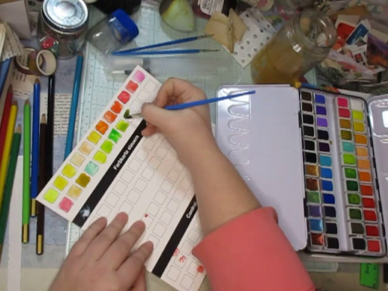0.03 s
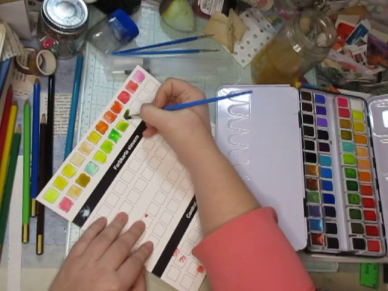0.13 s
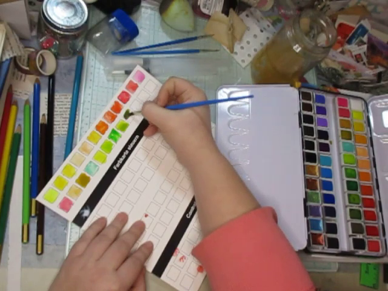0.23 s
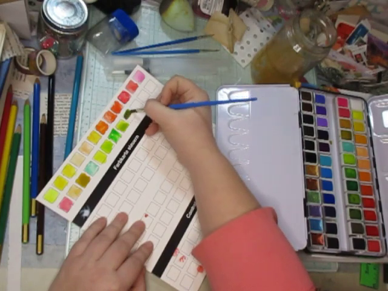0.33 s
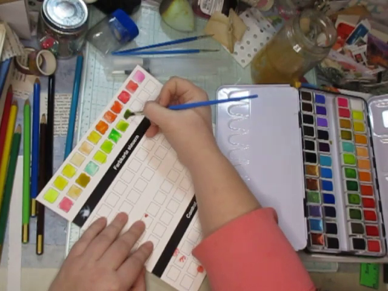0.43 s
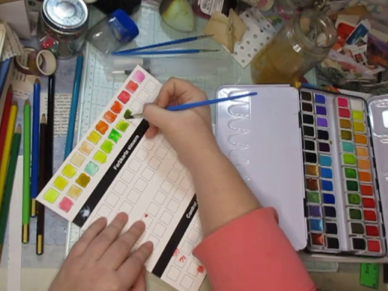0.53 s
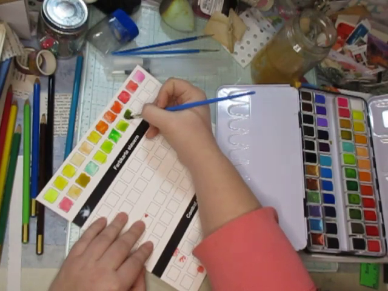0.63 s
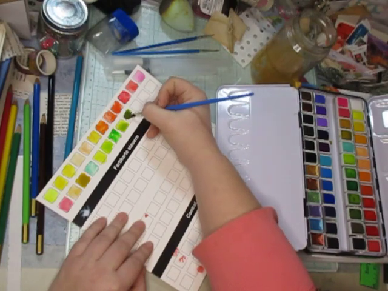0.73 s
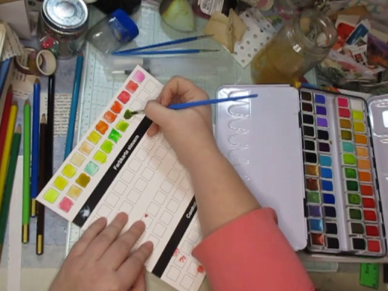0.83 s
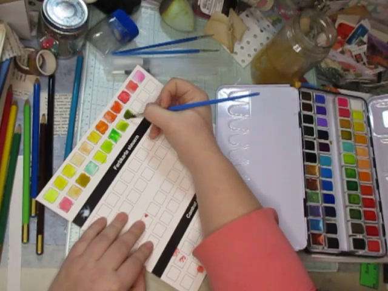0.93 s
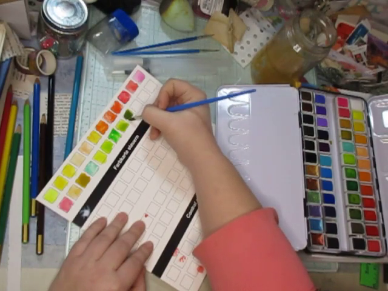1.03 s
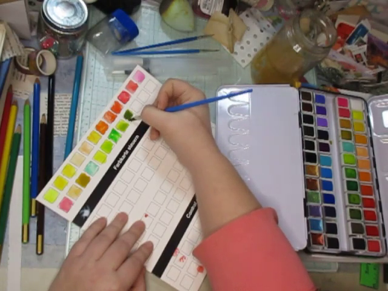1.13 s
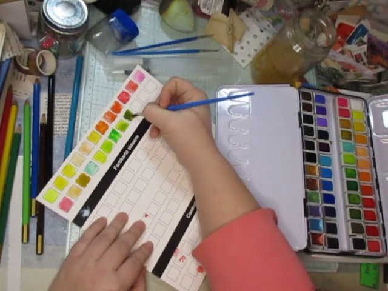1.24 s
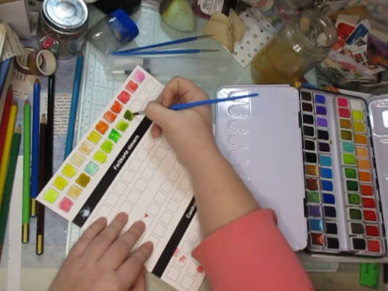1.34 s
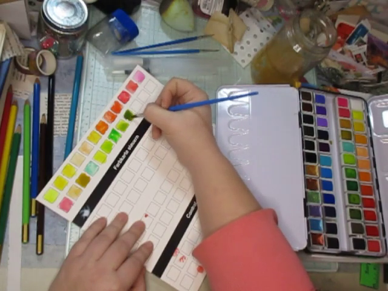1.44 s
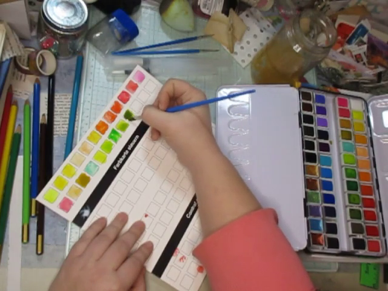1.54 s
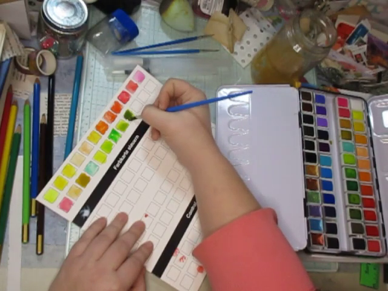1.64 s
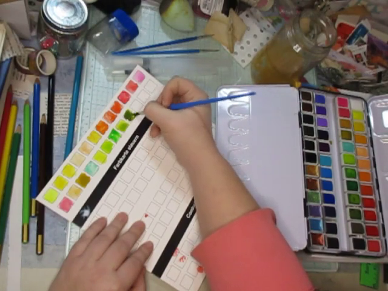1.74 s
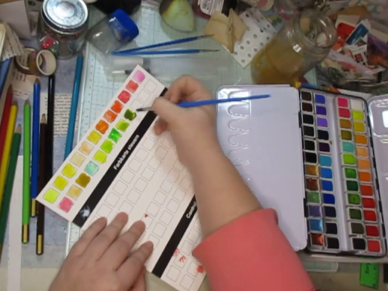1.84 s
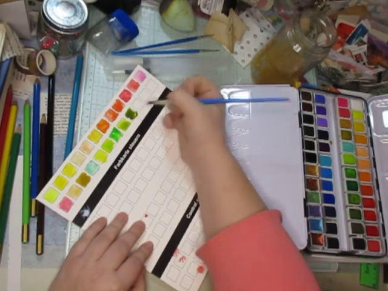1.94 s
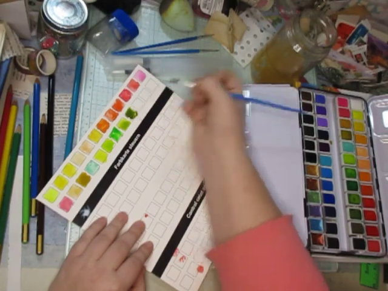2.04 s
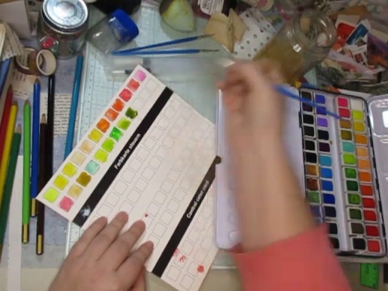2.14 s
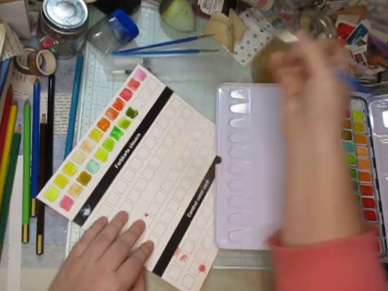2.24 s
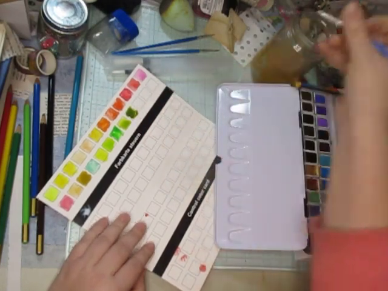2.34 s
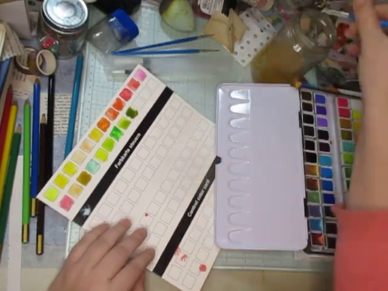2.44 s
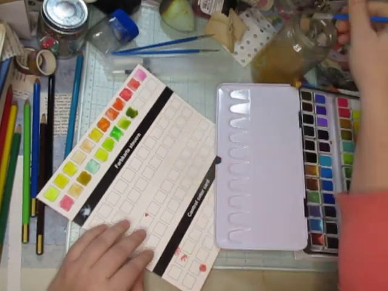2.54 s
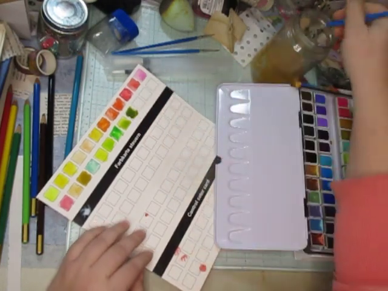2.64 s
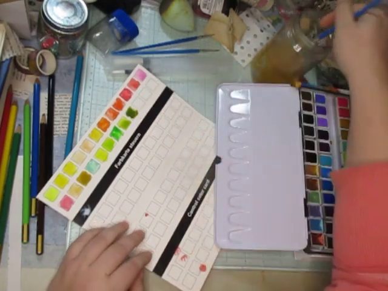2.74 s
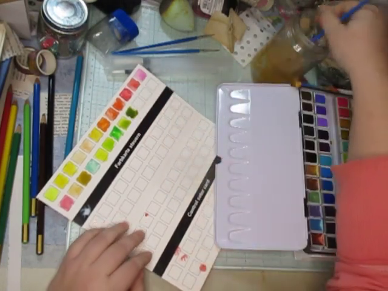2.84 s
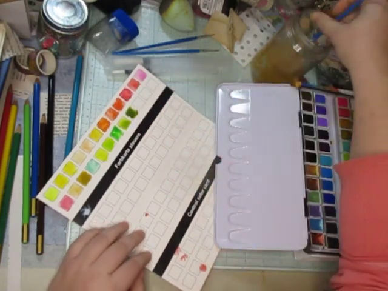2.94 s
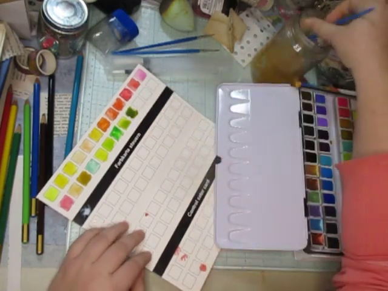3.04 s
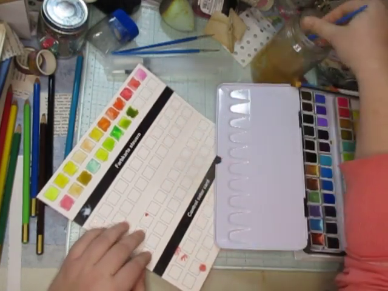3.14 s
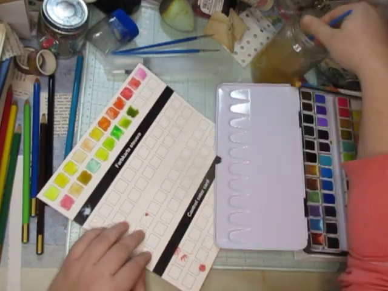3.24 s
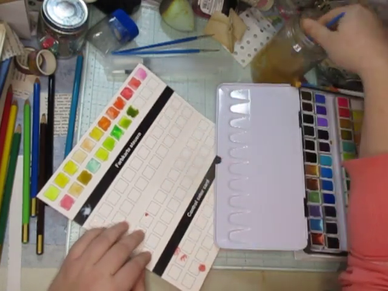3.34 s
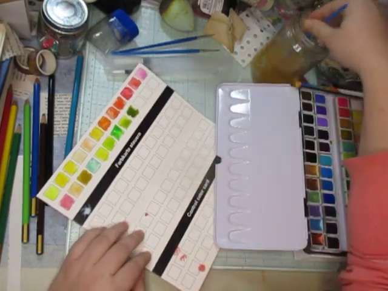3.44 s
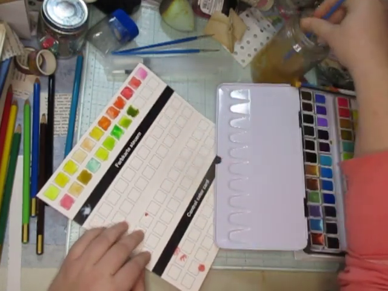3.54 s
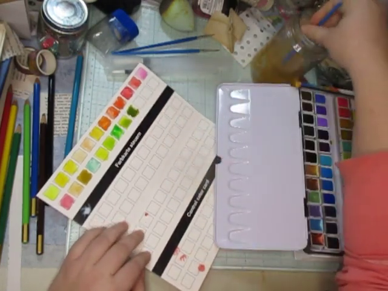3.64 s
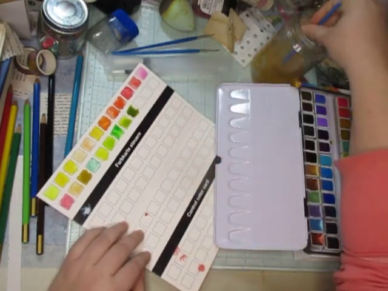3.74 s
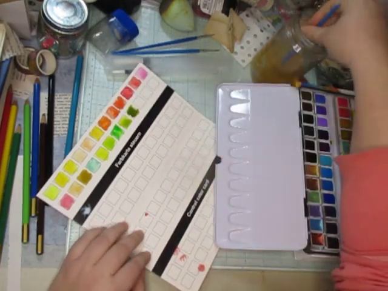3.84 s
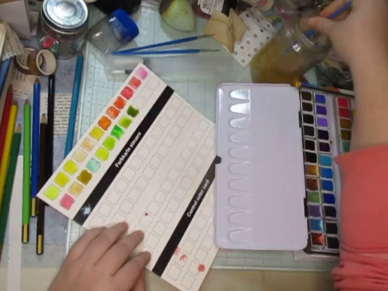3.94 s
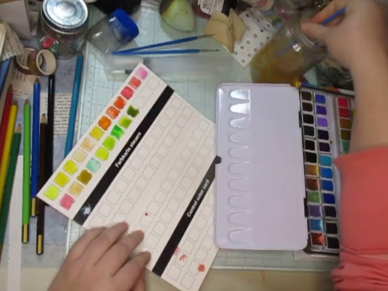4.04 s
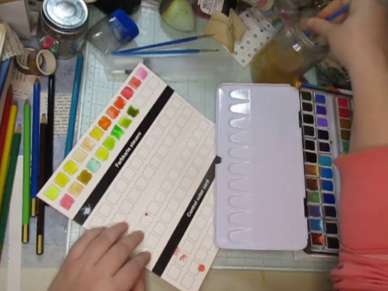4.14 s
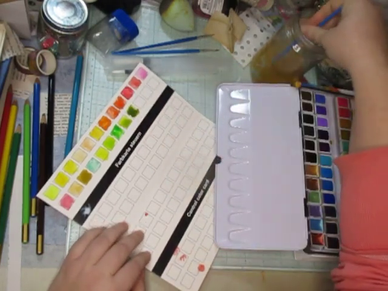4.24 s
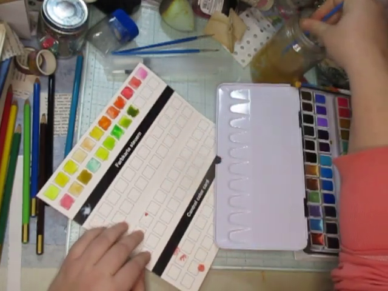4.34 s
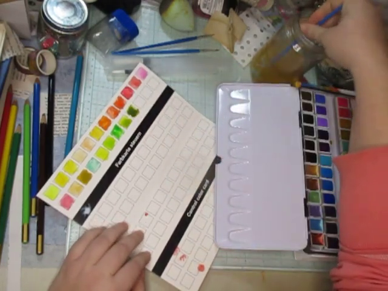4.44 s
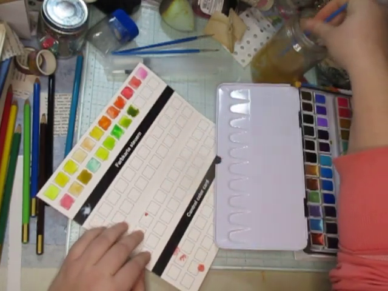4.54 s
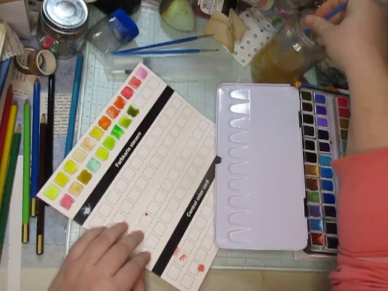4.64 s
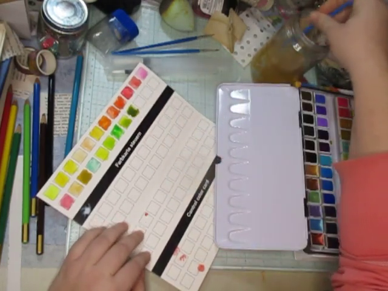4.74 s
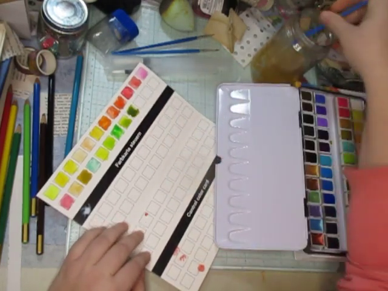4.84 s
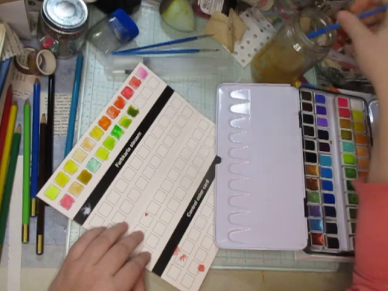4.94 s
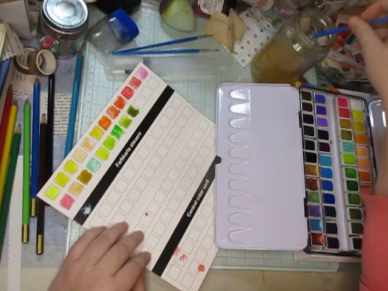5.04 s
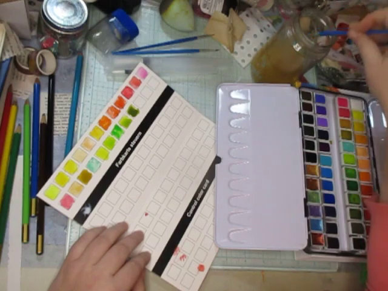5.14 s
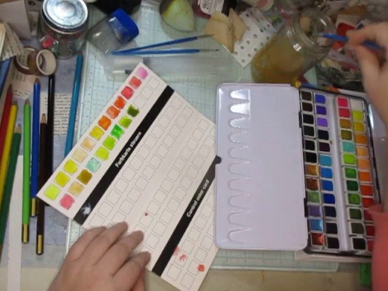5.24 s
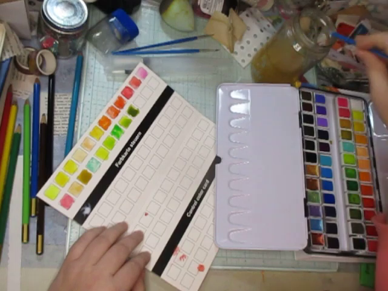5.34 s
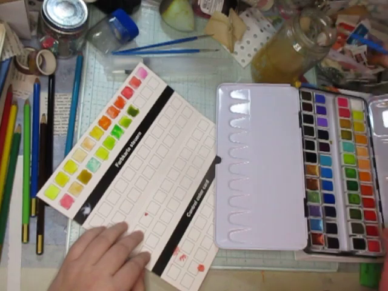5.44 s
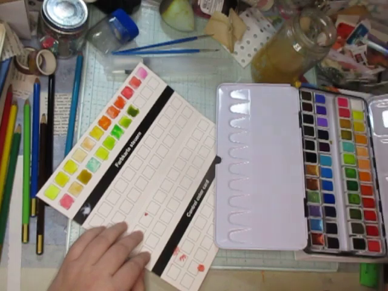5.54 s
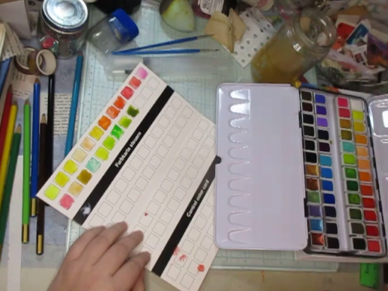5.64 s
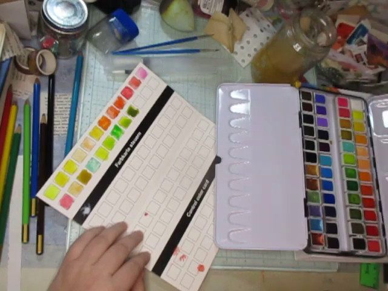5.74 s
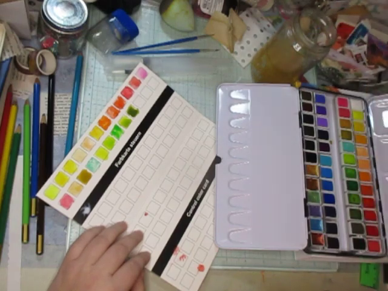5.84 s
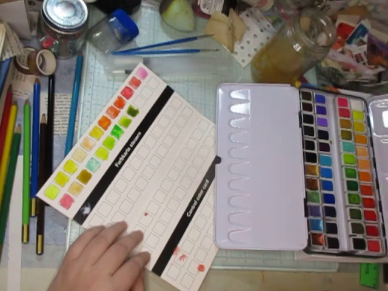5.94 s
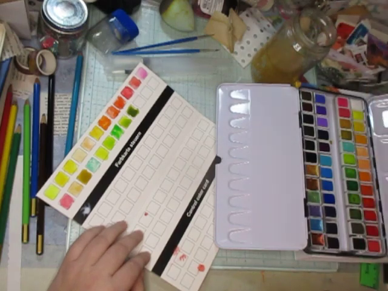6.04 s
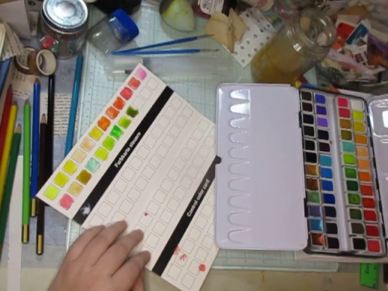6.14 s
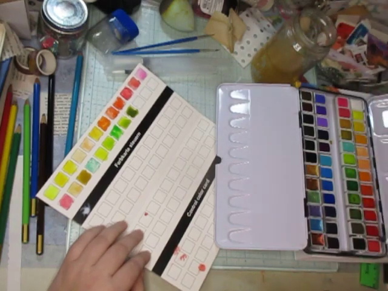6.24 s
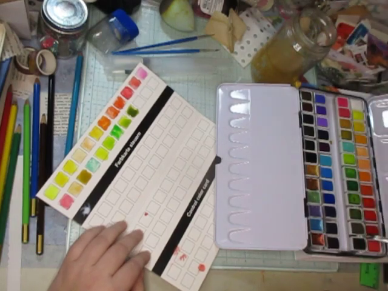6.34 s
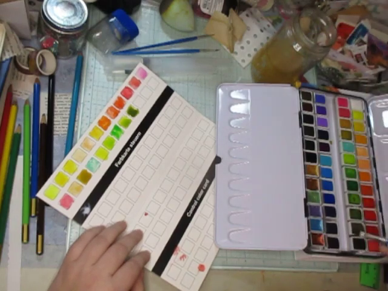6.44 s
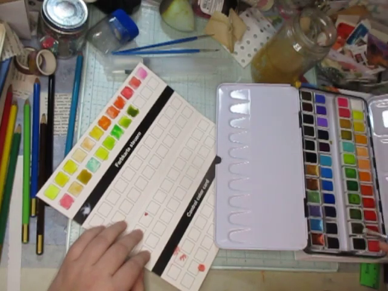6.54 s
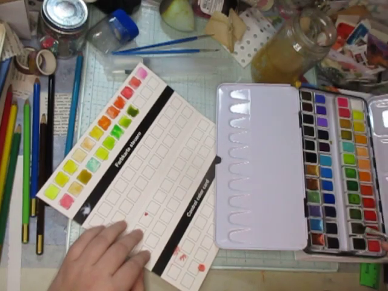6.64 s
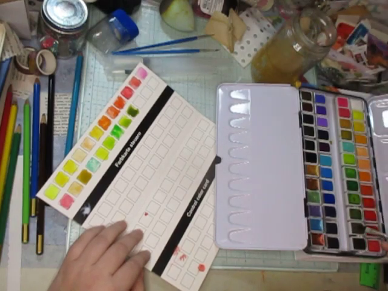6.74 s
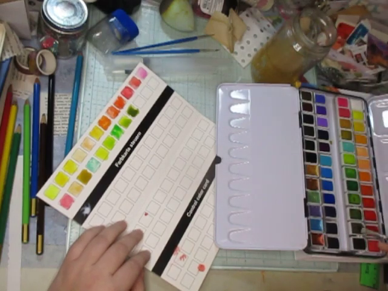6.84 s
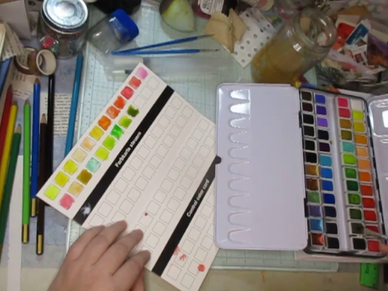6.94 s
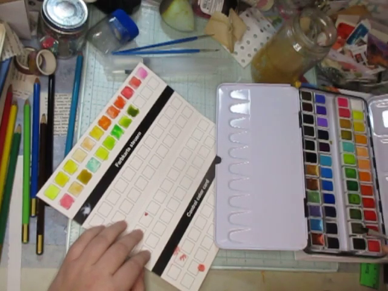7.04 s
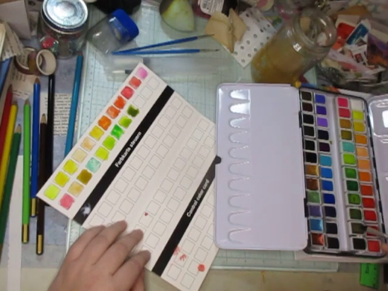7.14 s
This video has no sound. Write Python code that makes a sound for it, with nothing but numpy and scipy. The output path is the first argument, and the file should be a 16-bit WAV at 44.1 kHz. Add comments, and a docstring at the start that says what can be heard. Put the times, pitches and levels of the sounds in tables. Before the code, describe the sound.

Over a steady low hum and fan rush, faint brush dabs, then a brush handle knocks a water-filled glass jar; later one small high clink.

```python
"""Over a steady hum and fan noise come faint ticks and paper dabs, dull bumps, glass knocks and a high clink.
A paintbrush is rinsed in a glass jar of water on a craft table, in a small room.
Knocks are short pushes and noisy chatter sent through the jar's resonances; the clink is fading sine waves.
Dabs, ticks and bumps are shaped noise; swishes are noise around a rising pitch. Short echoes add the room.
The recorder's gain control turns the level down after hard knocks, then slowly lets it back up."""
import sys
import numpy as np
from scipy import signal
from scipy.fft import rfft, irfft
from scipy.io import wavfile
from scipy.ndimage import uniform_filter1d

SR = 44100
rng = np.random.default_rng(int(sys.argv[2]) if len(sys.argv) > 2 else 0)


def transcribe(signal):
    """Save signal, clipped to [-1, 1], as a 16-bit WAV file at the path in sys.argv[1]."""
    frames = np.atleast_2d(signal).T
    limited = np.clip(frames, -1, 1)
    pcm = np.round(limited * 32767).astype(np.int16)
    wavfile.write(sys.argv[1], SR, pcm)


N = 317816  # length of the scene in samples


def amp(db):
    """Turns decibels into a gain."""
    return 10 ** (np.asarray(db) / 20)


def unit(x):
    """Scales a sound to an rms level of 1."""
    return x / np.sqrt(np.mean(x ** 2) + 1e-20)


def read(points, hz):
    """Joins points by straight lines on a log-frequency axis."""
    f, value = np.transpose(points)
    return np.interp(np.log(hz + 1), np.log(f), value)


def add(mix, s, sound):
    """Lays a sound into the mix, starting at a time in seconds."""
    part = mix[round(s * SR):][:len(sound)]
    part += sound[:len(part)]


def noise(colour, size):
    """Makes noise of rms 1 whose spectrum follows the given points."""
    spectrum = rfft(rng.standard_normal(size))
    gain = amp(read(colour, np.fft.rfftfreq(size, 1 / SR)))
    return unit(irfft(spectrum * gain, size))


def soften(x, corner_hz):
    """Takes off treble with a gentle one-pole low-pass."""
    keep = np.exp(-2 * np.pi * corner_hz / SR)
    return signal.lfilter([1 - keep], [1, -keep], x)


def resonances(peaks, f):
    """Adds up the power of steep-sided resonances at each frequency."""
    return sum(amp(db) ** 2 / (1 + (2 * (f - hz) / width) ** 2) ** 2 for hz, width, db in peaks)


def background(air_db=-51.0, fan_db=-48.0):
    """Mains and motor tones, a fan rushing through the resonances of its housing, and plain hiss."""
    # steady tones of mains and fan motor: (frequency [Hz], rms level [dB])
    hum_tones = [(120.06, -39.5), (128.2, -66), (58.6, -64.5), (234.4, -71.5), (354.6, -71)]
    # resonances of the fan's rush: (frequency [Hz], width [Hz], level [dB])
    fan_peaks = [(816, 92, 0), (956, 71, -2), (1010, 56, 0), (1214, 146, 0), (1294, 160, -6),
                 (1452, 94, 2.5), (1620, 130, -6), (1728, 105, -5), (2015, 64, -10)]
    # spectrum of fan and room air: (frequency [Hz], level per Hz [dB])
    air_colour = [(20, -1.5), (90, -1.5), (180, -4.5), (300, -9), (550, -12), (1500, -8.5), (2200, -21),
                  (3100, -21.5), (4000, -24), (5200, -25), (8500, -26.5), (12000, -32.5), (16000, -38.5)]
    t, f = np.arange(N) / SR, np.fft.rfftfreq(N, 1 / SR)
    # each tone starts at a random point of its cycle
    hum = sum(amp(db) * np.sqrt(2) * np.sin(2 * np.pi * (hz * t + rng.random())) for hz, db in hum_tones)
    fan_spectrum = rfft(rng.standard_normal(N)) * np.sqrt(resonances(fan_peaks, f))
    fan = unit(irfft(fan_spectrum, N))
    return hum + amp(fan_db) * fan + amp(air_db) * noise(air_colour, N)


def arm_ticks(tick_t60=0.017, ticks_per_s=14, scatter_db=-45, scatter_spread_db=3):
    """Faint dry ticks as the arm moves: bursts of noise that die away at once."""
    # the clearest ticks: (time [s], starting level [dB])
    clear_ticks = [(0.198, -44.5), (0.398, -41.5), (.464, -43.5), (2.653, -42.5), (2.7, -42), (3.26, -41),
                   (3.301, -43)]
    # arm movements that scatter weaker ticks: (start [s], end [s])
    moves = [(.08, .45), (2.68, 2.87), (3.2, 3.7)]
    # spectrum of a tick: (frequency [Hz], level per Hz [dB])
    tick_colour = [(300, -10), (1500, 8.5), (2200, -5.5), (2900, 1), (4000, -13), (7000, -12), (15000, -37)]
    out, t = np.zeros(N), np.arange(SR // 10) / SR
    scatter = []
    for start, end in moves:
        # one tick at a random moment in each even time slot
        for slot in np.arange(start, end, 1 / ticks_per_s):
            s = slot + rng.random() / ticks_per_s
            scatter.append((s, scatter_db - scatter_spread_db * rng.random()))
    for s, db in clear_ticks + scatter:
        add(out, s, noise(tick_colour, len(t)) * amp(db - 60 * t / tick_t60))
    return out


def paper_dabs(count=4, first_s=.16, every_s=.48, length_s=.25, first_db=-70, growth_db=1.4):
    """Bristles dab the paper in an even rhythm: soft swells of hiss, a little firmer each time."""
    # spectrum of bristles on paper: (frequency [Hz], level per Hz [dB])
    bristles = [(2000, -14), (3500, -7), (4500, -9), (5250, 5), (6200, -14), (12000, -18)]
    out, size = np.zeros(N), int(length_s * SR)
    for k in range(count):
        hiss = noise(bristles, size) * np.hanning(size)
        add(out, first_s + k * every_s, amp(first_db + k * growth_db) * hiss)
    return out


def bumps(rise_share=0.033):
    """Dull, padded bumps and rubs: noise coloured mostly by the table's low resonances."""
    # soft bumps, and a slow low rub at 3.64 s: (time [s], level [dB], time to fall 60 dB [s])
    contacts = [(2.845, -36.5, 0.17), (3.24, -37, 0.13), (3.64, -49, 0.87), (3.815, -38, 0.24),
                (3.862, -34.5, 0.14)]
    # spectrum of the table: (frequency [Hz], level per Hz [dB])
    table_colour = [(100, -20), (220, -15), (300, 5.5), (370, -8), (440, 3), (520, -17), (640, -4),
                    (900, -16), (2000, -27), (3200, -27.5), (5000, -45)]
    out, t = np.zeros(N), np.arange(SR // 2) / SR
    for s, db, t60 in contacts:
        rise = 1 - np.exp(-t / (rise_share * t60))  # long rubs also start slowly
        add(out, s, noise(table_colour, len(t)) * amp(db - 60 * t / t60) * rise)
    return out


def jar_response(size=16384, spread_s=0.00088):
    """The jar's answer to one sharp blow: a crack that rings off in its resonances."""
    # resonances of the filled jar and the table under it: (frequency [Hz], width [Hz], level [dB])
    jar_peaks = [(306.7, 24.6, 3.5), (439, 51, -9.5), (632, 60, -3), (747, 104, -2), (850, 64, -7.5),
                 (936, 90, -2), (1057, 35, -2.5), (1170, 110, -5.5), (1482, 85, -4.5), (1615, 60, -6),
                 (1804, 94, -9.5), (1886, 61, -6), (2073, 106, -8), (2182, 86, -5.5), (2450, 114, -13.5),
                 (2770, 98, -12), (3066, 230, -11.5), (3340, 310, -17), (3480, 133, -18), (3680, 73, -14.5),
                 (4060, 260, -16), (4280, 280, -23.5), (5410, 280, -25.5), (6200, 230, -29.5),
                 (6700, 200, -31.5), (7330, 220, -25.5), (8200, 105, -32.5), (9030, 210, -33.5),
                 (9900, 270, -33), (10800, 250, -37)]
    # dense, weak resonances in between: (frequency [Hz], level [dB])
    between = [(30, -12), (100, -13), (200, -14.5), (600, -16), (2100, -24), (2600, -35), (4200, -34.5),
               (7500, -43.5), (12000, -48.5), (16000, -64)]
    f = np.fft.fftfreq(size, 1 / SR)
    power = resonances(jar_peaks, abs(f)) + amp(read(between, abs(f))) ** 2
    log_gain = np.log(power) / 2
    # this choice of phase keeps the ringing after the blow, never before it
    causal = np.conj(signal.hilbert(log_gain))
    # bending waves are slower in the bass: 1 kHz arrives spread_s late
    lag = 4 * np.pi * spread_s * np.sign(f) * np.sqrt(abs(f) * 1000)
    return np.fft.ifft(np.exp(causal - 1j * lag)).real[:size // 2]


def knocks(jar_db=31, spot_db=4, spot_q=2.2, water_t60=0.59, push_hz=5000, chatter_lift=1.4, light_hz=180):
    """Each contact is a push and a short, bright chatter on glass; soft or glancing ones lose the treble."""
    # brush handle against the jar: (time [s], strength [dB], glance from square 0 to sliding 1,
    # frequency favoured by the spot struck [Hz])
    hits = [(3.856, -14, .75, 350), (3.898, -13.5, 0.76, 780), (3.927, -16, .48, 2100),
            (3.9971, -3.5, 0.33, 930), (4.1863, -13, 0.4, 1300), (4.1963, -3, 0.38, 1540),
            (4.2534, -2.5, 0.68, 1520), (4.3105, -12.5, 0.5, 900), (4.509, -15, 0.71, 2800),
            (4.5587, 1.5, 0.23, 5400)]
    # treble corner of a square 0 dB blow; it rises with force and falls with glance
    hard_hz, hard_power, glance_power = 11020, 0.53, 1.91
    chatter_t60_s = 0.018  # for a square blow; a sliding handle chatters longer
    # the springy handle falls back once, this much later and weaker
    rebound_s, rebound_db, rebound_glance = .045, -20, .45
    force, t = np.zeros(N), np.arange(SR // 2) / SR
    rebounds = [(s + rebound_s, db + rebound_db, rebound_glance, spot_hz) for s, db, _, spot_hz in hits]
    for s, db, glance, spot_hz in hits + rebounds:
        share = np.clip(glance, 0, .95)
        corner_hz = hard_hz * amp(db) ** hard_power * (1 - share) ** glance_power
        t60 = chatter_t60_s / (1 - share)
        chatter = rng.standard_normal(len(t)) * amp(-60 * t / t60)
        brightened = chatter + chatter_lift * np.diff(chatter, prepend=0)
        chatter = brightened / np.linalg.norm(chatter)
        push = soften(signal.unit_impulse(len(t)), push_hz)
        blow = np.sqrt(1 - share) * push + np.sqrt(share) * chatter
        spot = signal.lfilter(*signal.iirpeak(spot_hz, spot_q, fs=SR), blow)
        blow = blow + (amp(spot_db) - 1) * spot
        add(force, s, amp(db) * soften(blow, corner_hz))
    force = force - soften(force, light_hz)  # a light brush moves little bass
    jar = jar_response()
    damped = jar * amp(-60 * t[:len(jar)] / water_t60)  # the water makes all the ringing fade sooner
    return amp(jar_db) * signal.oaconvolve(force, damped)[:N]


def swishes(width_hz=600, slosh_db=-3):
    """A pocket of air behind the brush shrinks, so its resonance rises over a short slosh."""
    # water swishing round the brush: (time [s], length [s], level [dB], start pitch [Hz], end pitch [Hz])
    strokes = [(4.509, 0.03, -40, 2650, 3020), (4.526, 0.05, -51, 3090, 3320),
               (4.644, 0.038, -52, 2290, 3320)]
    # spectrum of the slosh: (frequency [Hz], level per Hz [dB])
    slosh_colour = [(100, -18), (300, 1), (1000, -5), (1700, 3), (3300, -19), (4500, -24), (12000, -45)]
    out = np.zeros(N)
    for s, length, db, start_hz, end_hz in strokes:
        size = int(length * SR)
        glide_hz = np.linspace(start_hz, end_hz, size)
        turn = np.exp(2j * np.pi * np.cumsum(glide_hz) / SR)
        rough = rng.standard_normal(size) + 1j * rng.standard_normal(size)
        fuzz = signal.lfilter(*signal.butter(2, width_hz / 2, fs=SR), rough)
        pocket = unit((fuzz * turn).real)  # a band of noise that follows the gliding pitch
        water = pocket + amp(slosh_db) * noise(slosh_colour, size)
        add(out, s, amp(db) * water * signal.windows.tukey(size, .5))
    return out


def ring(modes):
    """Half a second of sine tones that die away after one blow."""
    t = np.arange(SR // 2) / SR
    return sum(amp(db - 60 * t / t60) * np.sin(2 * np.pi * hz * t) for hz, db, t60 in modes)


def clink(rise_s=0.00085, tick_db=-20, tick_t60=0.028):
    """Above the water the bare rim rings high and clear, with a tiny metallic tick at its start."""
    # the metal ferrule touches the rim: (time [s], level [dB])
    touch_s, touch_db = (5.3411, -29.5)
    # tones of the rim: (frequency [Hz], level [dB], time to fall 60 dB [s])
    rim = [(3290, -0.5, 0.058), (3280, -20, .24), (5344, -14, 0.09), (5300, -27, 0.11), (6090, -23.5, 0.11),
           (8484, -22.5, 0.083), (10300, -30, .08), (11510, -29, .12)]
    out, t = np.zeros(N), np.arange(SR // 2) / SR
    tick = rng.standard_normal(len(t)) * amp(tick_db - 60 * t / tick_t60)
    rise = 1 - np.exp(-t / rise_s)
    add(out, touch_s, amp(touch_db) * (ring(rim) + tick) * rise)
    return out


def room(x, wet_db=-13, near_db=-12, near_s=.011):
    """First echoes from things on the table, then a short tail that dies faster in the treble."""
    # how long the room rings: (frequency [Hz], time to fall 60 dB [s])
    decay = [(150, 0.39), (600, 0.3), (2000, 0.22), (4000, 0.16), (10000, .14)]
    taps = rng.standard_normal(SR // 2) * (rng.random(SR // 2) < .1)  # about one sample in ten echoes
    hz, t, z = signal.stft(taps, SR, nperseg=256)
    fading = z * amp(-60 * t / read(decay, hz)[:, None])
    tail = signal.istft(fading, SR, nperseg=256)[1]
    tail *= np.minimum(np.arange(len(tail)) / SR / near_s, 1)  # the tail builds up over near_s
    echoes = amp(wet_db) * tail / np.linalg.norm(tail)
    delays = rng.uniform(near_s / 10, near_s, size=8)
    signs = rng.choice([-1, 1], len(delays))
    echoes[(delays * SR).astype(int)] += amp(near_db) * signs / np.sqrt(len(delays))
    return x + signal.fftconvolve(x, echoes)[:N]


def scene():
    """All sounds at the table pass through the room; the background is added after it."""
    table_sounds = knocks() + bumps() + clink() + swishes() + arm_ticks() + paper_dabs()
    return (room(table_sounds) + background())[None]


def record(dry, threshold_db=-19, slope=0.32, recover_db=3.5, fall_s=0.045, edge_hz=15850):
    """Gain control dips after loud knocks and recovers by recover_db each second; then the top is cut off."""
    power_db = 10 * np.log10(abs(uniform_filter1d(dry[0] ** 2, size=256)) + 1e-12)
    release = np.arange(N) / SR * recover_db
    wanted_cut_db = slope * np.maximum(power_db - threshold_db, 0)
    # hold the deepest cut so far, while it recovers steadily
    cut_db = np.maximum.accumulate(wanted_cut_db + release) - release
    lag = np.exp(-1 / (fall_s * SR))
    smooth_cut_db = signal.lfilter([1 - lag], [1, -lag], cut_db)
    ducked = dry * amp(-smooth_cut_db)
    edge = signal.firwin(511, edge_hz, window=("kaiser", 9), fs=SR)
    return signal.oaconvolve(ducked, edge[None], "same")


dry = scene()
out = record(dry)
transcribe(out)
```